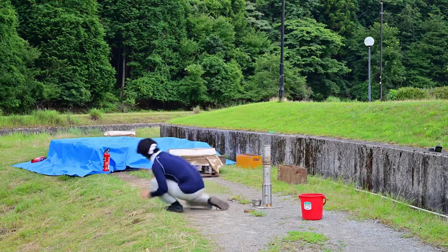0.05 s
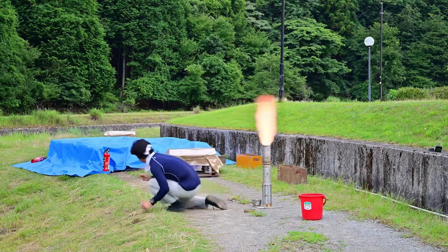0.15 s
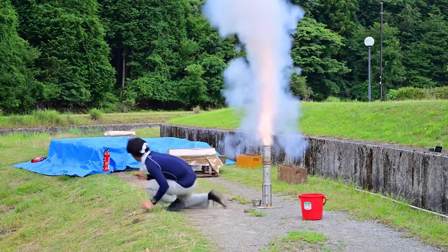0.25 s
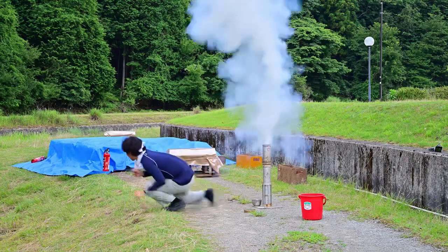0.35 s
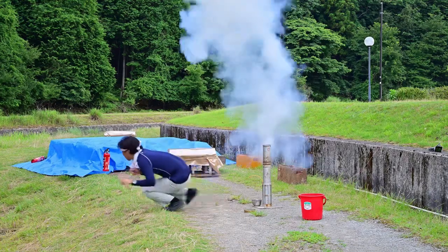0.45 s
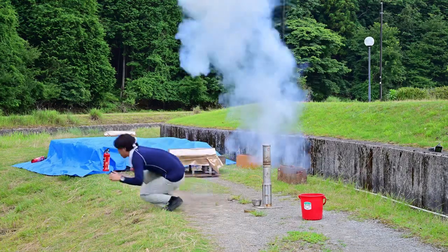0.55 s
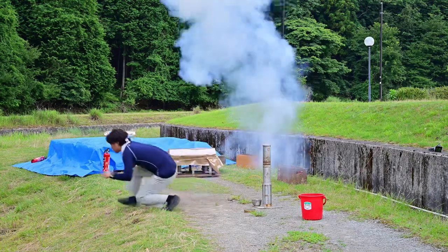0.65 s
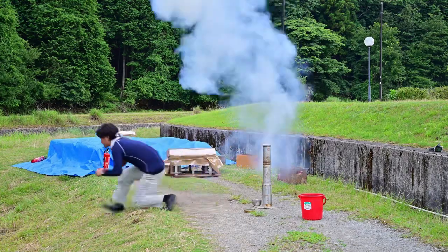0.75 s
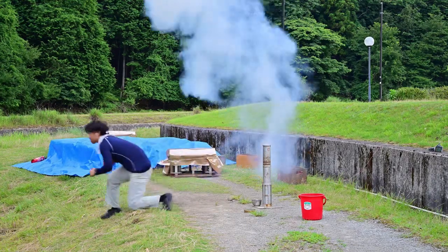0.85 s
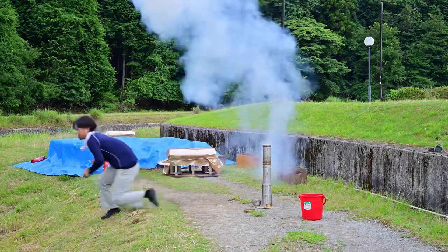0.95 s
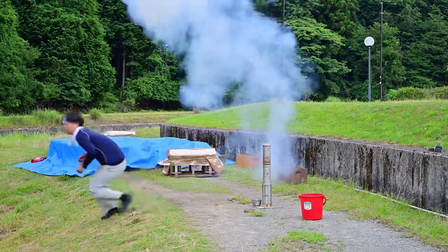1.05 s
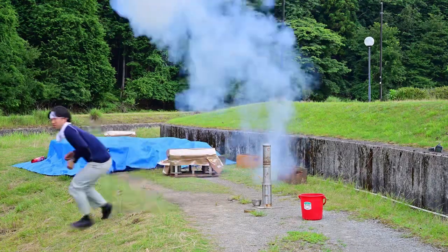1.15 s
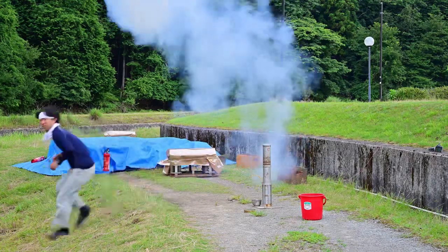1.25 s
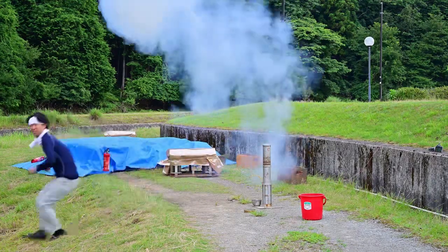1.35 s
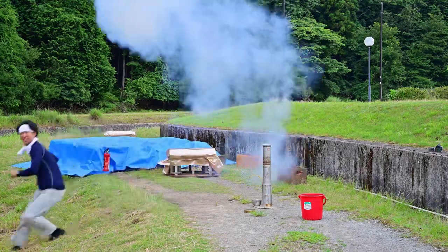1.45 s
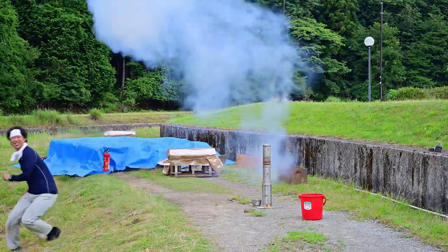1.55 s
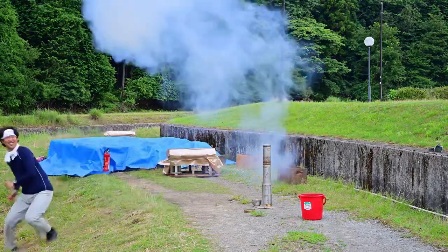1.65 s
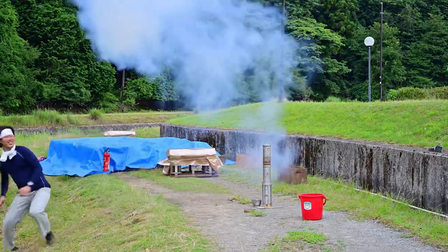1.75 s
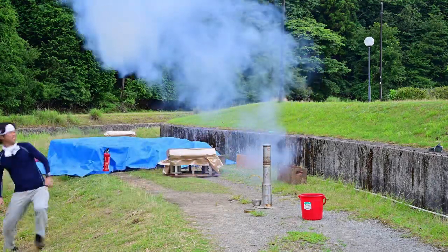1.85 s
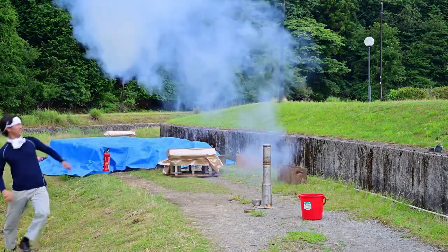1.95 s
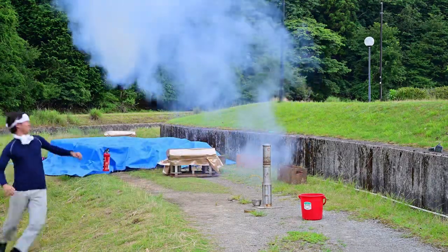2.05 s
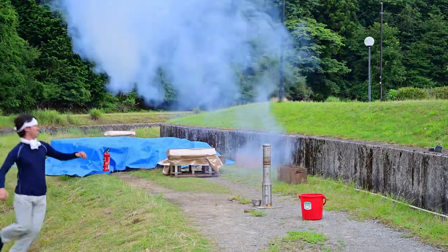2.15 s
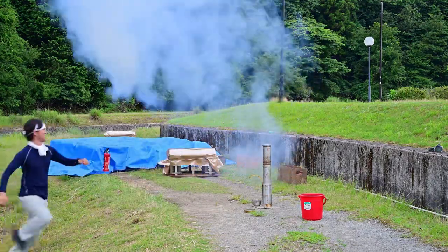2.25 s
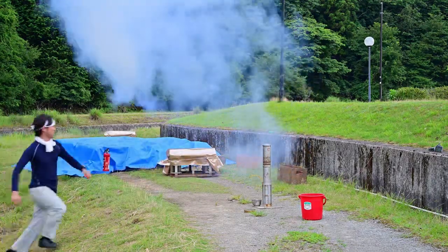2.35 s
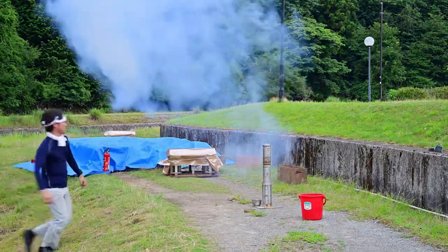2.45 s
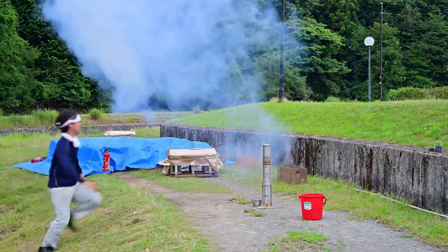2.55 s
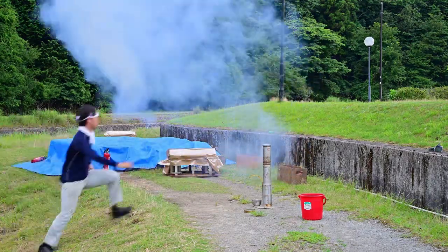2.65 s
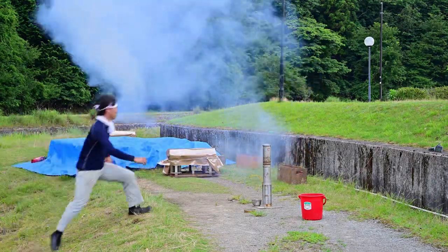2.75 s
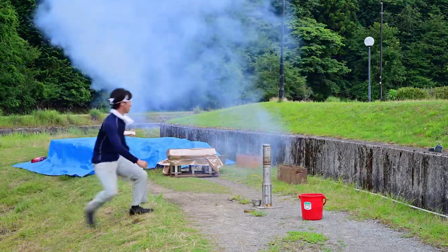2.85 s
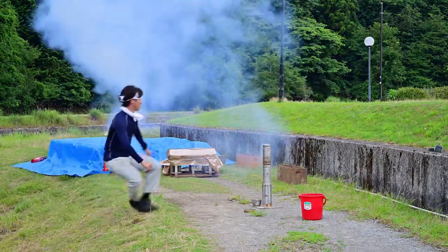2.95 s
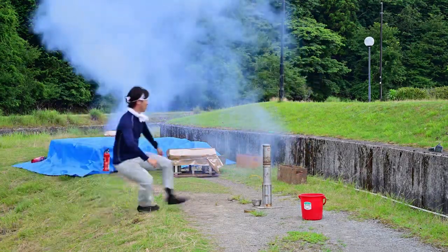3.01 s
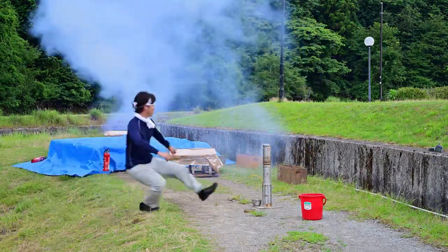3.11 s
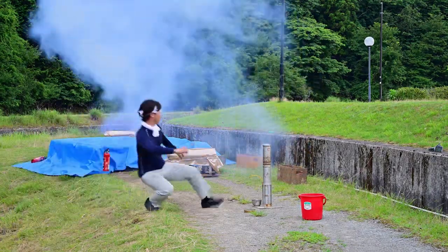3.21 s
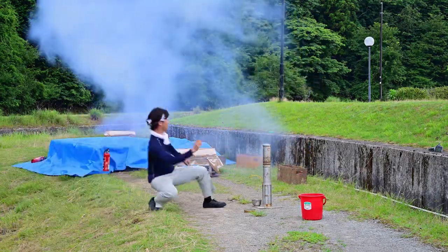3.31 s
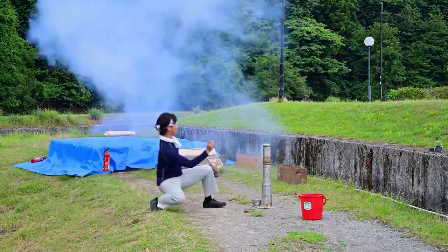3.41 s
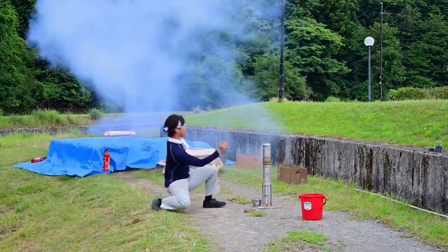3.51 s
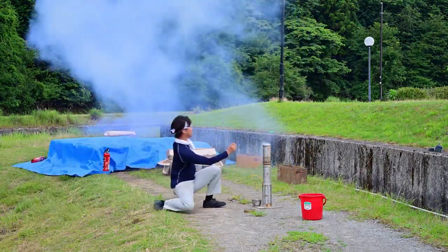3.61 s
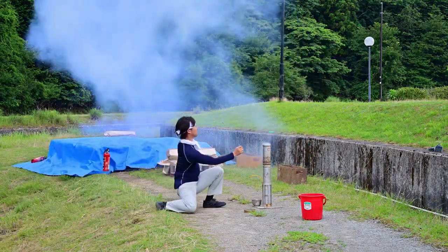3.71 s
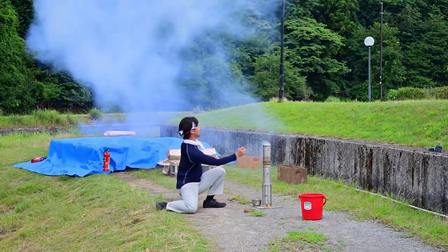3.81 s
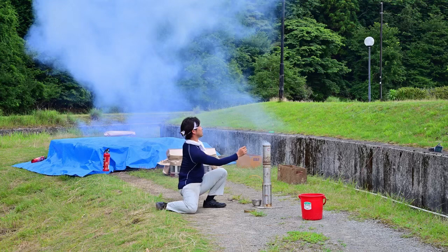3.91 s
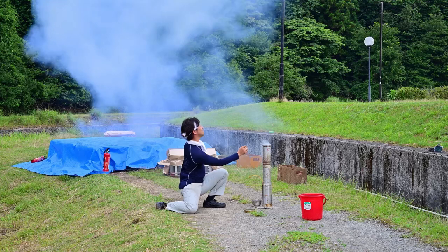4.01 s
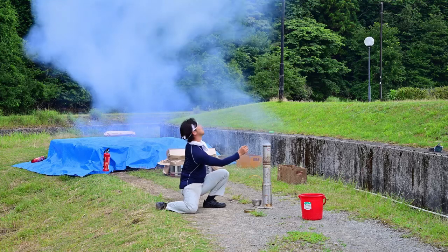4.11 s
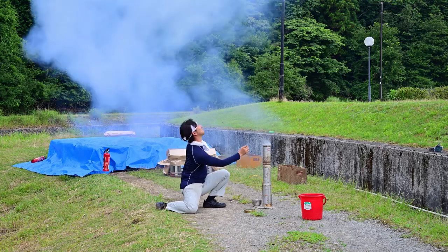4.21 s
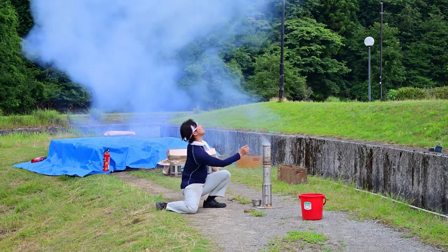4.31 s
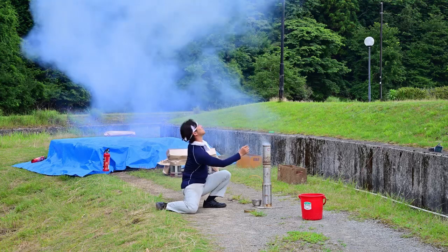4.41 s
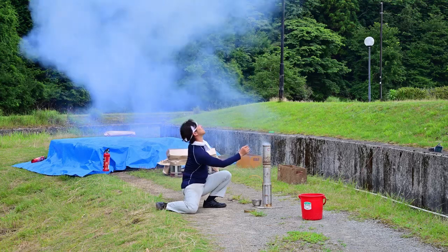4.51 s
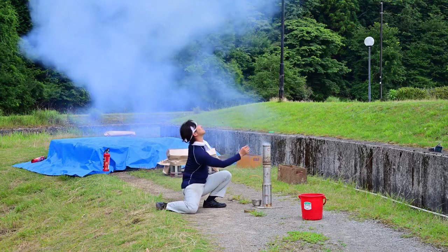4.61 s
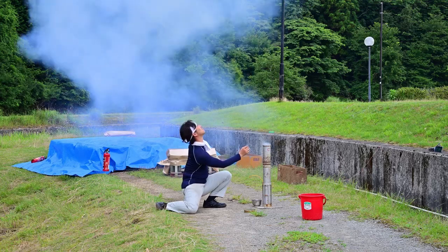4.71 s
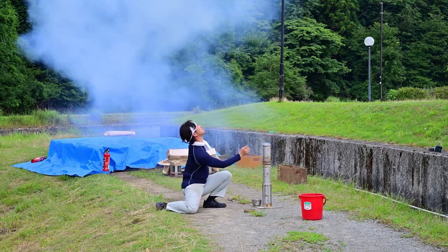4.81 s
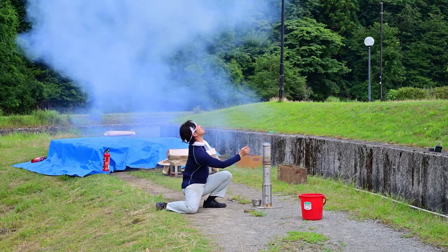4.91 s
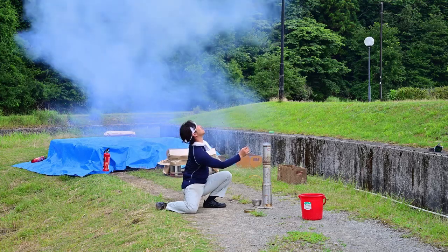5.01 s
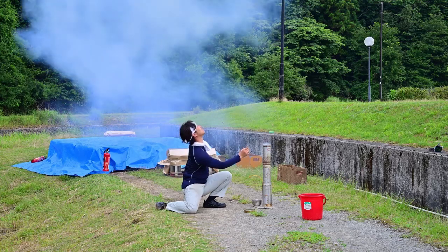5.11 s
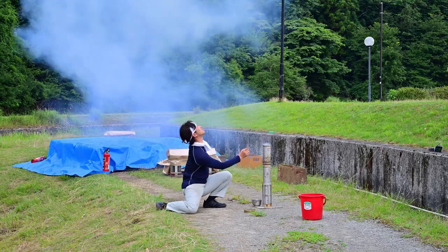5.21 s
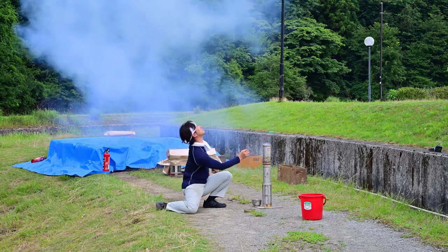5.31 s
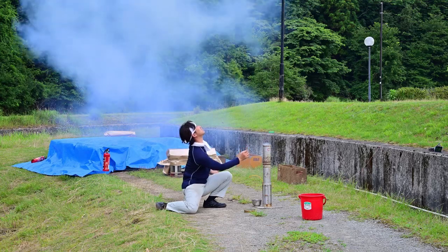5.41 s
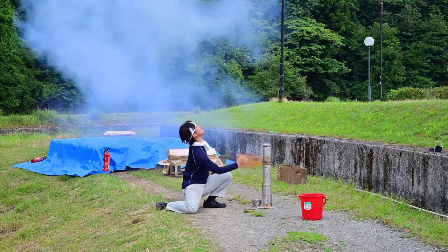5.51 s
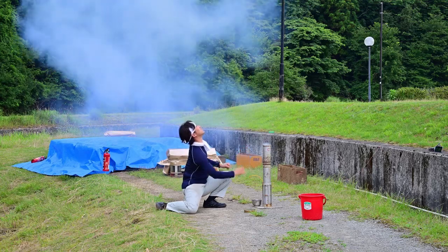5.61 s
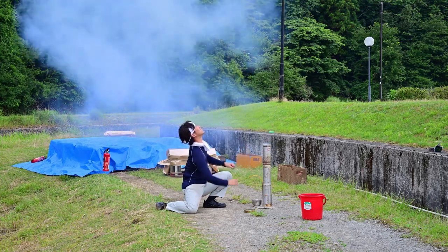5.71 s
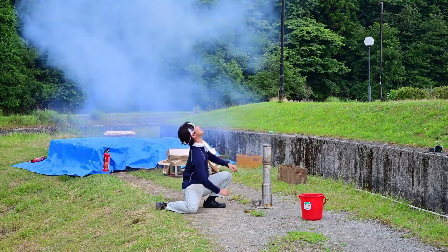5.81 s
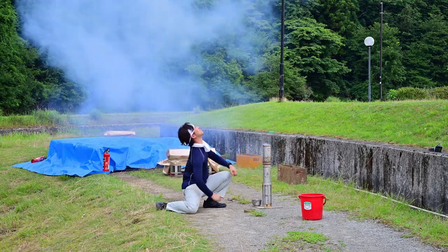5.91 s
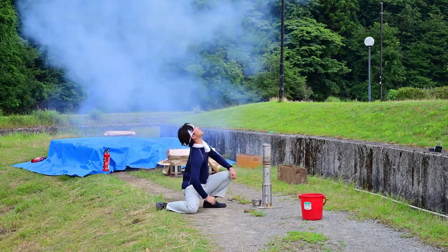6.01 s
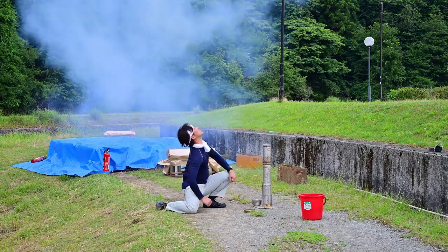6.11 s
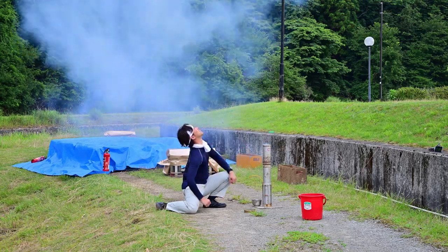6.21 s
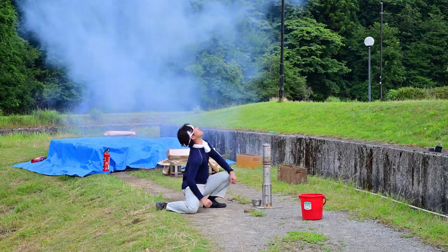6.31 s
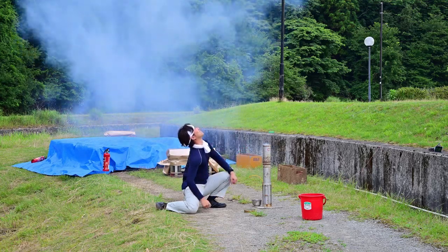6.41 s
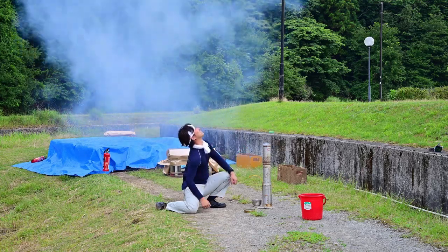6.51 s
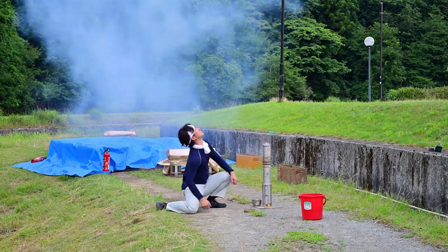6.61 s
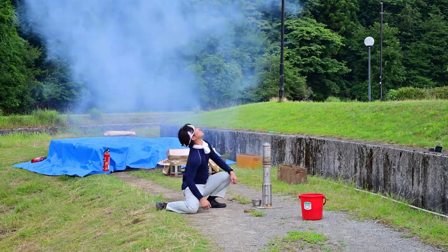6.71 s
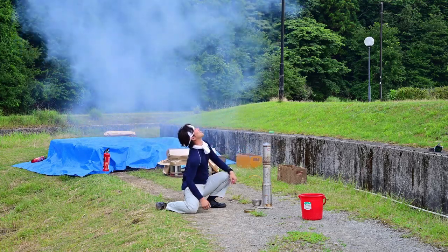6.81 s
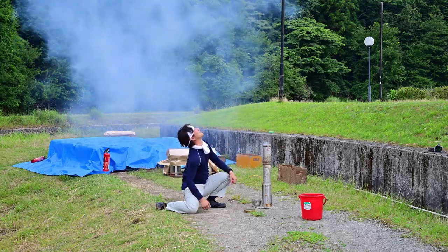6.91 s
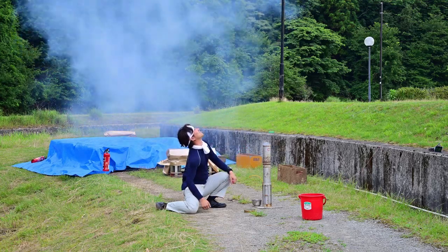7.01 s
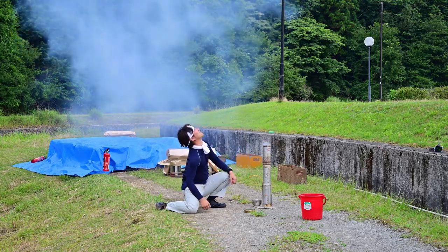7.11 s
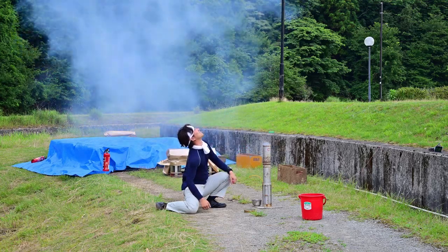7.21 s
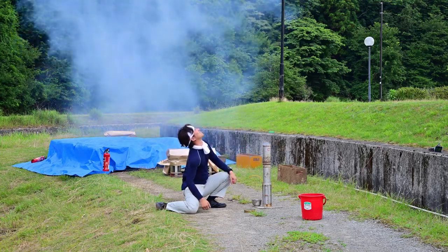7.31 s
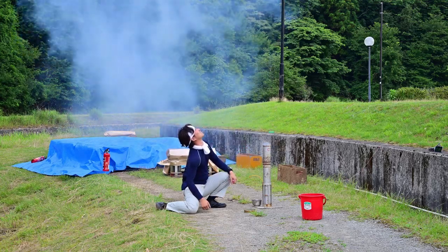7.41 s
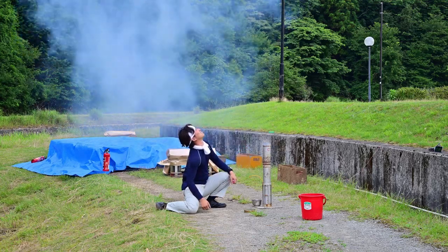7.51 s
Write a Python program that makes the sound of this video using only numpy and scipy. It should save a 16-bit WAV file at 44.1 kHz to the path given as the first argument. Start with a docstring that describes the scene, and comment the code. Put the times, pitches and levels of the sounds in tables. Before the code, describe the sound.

Outdoor firework launch: short hiss, ragged roaring thump, running steps on grass, insects, a sharp lone report, then a late string of heavy explosions.

```python
"""A fuse hisses, then gas surges from a steel mortar on a lawn: shaped noise makes a ragged roar and boom.
A man steps over grass, as damped tones and noise brushes; a small shell bursts, then a string of large ones.
Each burst is a pressure pulse that returns from the ground, a low wall and the woods, as delayed pulses
and scattered noise; under it the background sinks briefly. Insects, wind and hiss are filtered noise.
The loudest peaks are cut off at full scale."""
import sys
import numpy as np
from scipy import signal
from scipy.fft import rfft, irfft, next_fast_len
from scipy.io import wavfile
from scipy.ndimage import uniform_filter1d

SR = 44100
rng = np.random.default_rng(int(sys.argv[2]) if len(sys.argv) > 2 else 0)


def file_out(sig):
    """Save sig as 16-bit WAV at sys.argv[1]."""
    # one column per channel
    cols = np.atleast_2d(sig).T
    # limit, then scale
    lim = np.clip(cols, -1, 1)
    pcm = np.round(lim * 32767).astype(np.int16)
    wavfile.write(sys.argv[1], SR, pcm)


N = 333030  # samples

# Every spectrum below lists: frequency_hz, density_db (relative, per Hz)

# Overhead shells: start_s, level_db, push_ms, rebound (share), rattle (share), ground_delay_ms,
# ground_rebound (share), left_lag_ms, wall_level_db, woods_level_db, stretch (factor), size (0 to 1)
BURSTS = [(3.5570, 0.5, 0.6, 0.68, .027, 7.46, 0.57, 0.032, -12.5, 2.5, 0.93, 0.21),
          (6.4604, -3, 0.49, 2.47, 0.63, 7.44, .3, 0.17, -26, 15.5, 1.14, 0.71),
          (6.4646, -3, 0.83, 0.45, 0.089, 7.2, .75, 0.028, -1.5, 16, 1.06, 0.84),
          (6.7261, -5.5, 0.63, 2.7, 0.32, 7.25, 0.86, 0.053, -14, 15.5, 1.075, 0.68),
          (6.883, -2, 0.7, 1.74, .36, 7.18, 0.78, 0.054, -3, 17, 1.09, 0.73),
          (7.2027, -0.5, 0.61, 1.84, 0.37, 6.96, 0.64, 0.059, -1.5, 17, 1.066, 0.74)]
# Wall echoes after the ground echo: delay_ms (before stretch), level_db (re wall level), top_hz
WALL_ECHOES = [(4.2, 4.5, 2500), (6.3, -10.5, 1260), (8.3, -6.5, 800)]
# Nearest trunks: delay_ms (before stretch), level_db (before the woods level's share)
TREELINE_ECHOES = [(148, -24), (150.5, -23.5), (153, -24), (156, -27), (161, -39), (172, -31)]
# Scattered returns of a burst: delay_s (before stretch), rise_s, t60_s, level_db (re woods level),
# bass_db and treble_db (re that level, before the charge size is added)
BURST_RETURNS = [(0.016, .015, 0.2, -32, -4.5, -11), (.05, .01, 0.92, -49, 2, -12.5),
                 (.1, 0.0074, 0.8, -56, -7, 6), (.148, 0.0036, 0.58, -35.5, -6, -19),
                 (.19, .02, 1.5, -42.5, -8.5, -15), (.2, 0.1, 4.18, -46.5, -9, -14.5)]
# Spectrum of the woods' echo of a small shell
SMALL_ECHO_SPECTRUM = [(24, -42), (40, -11.5), (256, -7.5), (345, -7), (392, -5.5), (422, 1), (529, -4),
                       (3300, -22.5), (7540, -25.5), (12500, -49), (16000, -85)]
# Spectrum of the woods' echo of a large shell
LARGE_ECHO_SPECTRUM = [(15, -49), (25, -33.5), (120, -10.5), (309, -1), (463, -16.5), (677, -8), (796, -16),
                       (1070, -14), (2050, -22.5), (9840, -31.5), (12900, -45), (14400, -56), (16000, -105)]
# Left-right likeness of scattered echoes: frequency_hz, correlation (-1 to 1)
ECHO_CORRELATION = [(60, 1), (180, 0.98), (550, 0.91), (1650, 0.18), (4970, -0.3), (15000, 0.34)]
# Spectrum of the noise that rides on a shock
FIZZ_SPECTRUM = [(1500, -6.5), (5000, 0.0), (9000, -7.5), (14000, -7.0), (16000, -30.0)]
NEEDLE_MS, GROUND_NEEDLE_MS = .055, 0.068  # turf blunts the front
REBOUND_MS, REBOUND_MS_PER_SIZE = 0.71, 3.1  # a bigger charge rebounds longer
LAG_GROWTH_MS = .12  # added left lag of each later ground or wall echo, at size 1
ROLL_MS, ROLL_DB = 26, 1.22  # uneven stands of trees make the echo roll

# Surges of gas from the muzzle: start_s, roar_db, treble_db (re roar), boom_db, hold_ms, fade_db_per_ms
SURGES = [(0.2157, -3.5, 0.5, -8, 8, 4.5), (.232, -5.5, -2.5, -3.5, 3.3, .85),
          (.250, -19.5, 1.5, -17, 11.4, .8), (.285, -22, 1, -10, 2.2, .7), (0.353, -32, -20, -18.5, 10, 2)]
# Spectrum of the muzzle roar
ROAR_SPECTRUM = [(180, -31), (300, -9.5), (537, -11.5), (1100, -7), (2070, -11.5), (2400, -13.5),
                 (5430, -18), (6300, -19.5), (8360, -18.5), (16000, -39)]
# Spectrum of the muzzle boom
BOOM_SPECTRUM = [(12, -46), (20, -14), (49, -7.5), (139, -6), (177, -1), (238, -4), (296, -19), (500, -14),
                 (650, -43.5), (1100, -120)]
# Scattered returns of the lift, nearest first: delay_s, rise_s, t60_s, level_db,
# bass_db and treble_db (re that level)
LIFT_RETURNS = [(.17, .012, 0.66, -26.5, 6, -6), (.2, 0.039, 1.1, -27, -10, -11),
                (.3, .1, 3.7, -43.5, 2, -7.5)]
# Spectrum of the lift's echo
LIFT_ECHO_SPECTRUM = [(15, -53), (25, -22), (76, 0), (223, -12), (270, -12), (516, -7.5), (659, -12.5),
                      (1160, -11), (1400, -14.5), (9570, -29.5), (12500, -47), (14400, -51), (16000, -100)]
SURGE_RISE_DB_PER_MS = 4
SWELL_DB_PER_MS, SWELL_ROAR_DB, SWELL_BOOM_DB = 1.25, -19, -18  # gas swells before the first surge
TRAIL_S, TRAIL_ROAR_DB, TRAIL_BOOM_DB = .185, -39, -28  # and trails on weakly after it

# The tube kicks the ground: start_s, level_db, pitch_hz, t60_s
THUMP = (0.22, -11, 75.5, 0.2)
# Debris lands on something hard: centre_s, level_db, centre_hz, width_hz, length_ms
SNAP = (.345, -25.5, 3300, 1500, 3.5)
# Spectrum of the burning fuse
FUSE_SPECTRUM = [(120, -48), (200, -18), (245, -2), (350, -21), (2150, -7.5), (3630, -27.5), (4680, -10.5),
                 (7920, -8), (11500, -24), (15000, -53.5), (22000, -120)]
FUSE_DB = -59.5

# Feet land on turf: start_s, level_db, pitch_hz, pan_db (left above right)
THUDS = [(0.923, -42.5, 154, 0), (0.96, -44, 91.5, -2), (1.11, -44, 170, 0.0), (1.136, -45, 99.2, 1),
         (1.199, -48, 101, -2), (1.597, -44, 95.8, -2.5), (2.36, -58, 91.5, 0.5), (2.981, -52.5, 90, 10.5),
         (3.148, -52, 86.1, 6), (3.343, -48, 109.8, -12), (3.366, -46, 135, -17), (3.408, -50, 104.8, -20),
         (3.509, -44.5, 130, -19), (4.952, -52.5, 50.88, 16), (5.442, -52, 60.7, -16),
         (5.679, -49, 67.3, 3)]
# Grass and gravel scuff: start_s, level_db, length_s (fade by 26 dB), centre_hz, treble_db
SCUFFS = [(0.0226, -46.5, 0.041, 1900, -3.5), (0.124, -53, .045, 1880, -8), (0.164, -42, 0.03, 1500, -6),
          (0.824, -48, 0.1, 1200, -24), (0.87, -43.5, 0.047, 1170, -12), (0.976, -48, 0.081, 1340, -9),
          (1.021, -52.5, 0.064, 1130, -5), (1.118, -51.5, .06, 1016, -9), (1.151, -48.5, .06, 1820, -4),
          (2.996, -58, .035, 900, -14), (3.2796, -63, 0.049, 1236, -14), (3.318, -62.5, .05, 1590, -16),
          (3.349, -60, 0.025, 1500, -18), (5.761, -52, .075, 1500, -8), (5.806, -45, 0.031, 1540, -8),
          (5.822, -57.5, 0.15, 1300, -10)]

# Spectrum of the insects before the small burst
CHORUS_HIGH_SPECTRUM = [(2060, -58.5), (3500, -34.5), (4250, -32.5), (5620, -15), (7800, 0.5), (8660, -6),
                        (10500, -32.5), (11200, -42), (11500, -36), (15000, -70), (22000, -120)]
# Spectrum of the insects after it
CHORUS_LOW_SPECTRUM = [(2350, -56), (4000, -28), (4700, -20), (5360, -11.5), (5730, -5.5), (6680, -2),
                       (7450, -2), (7840, -2), (9210, -15.5), (10600, -33.5), (11000, -46.5), (14300, -73),
                       (22000, -120)]
CHORUS_DB, CHORUS_AFTER_DB = -55.5, -56  # before each side's own offset

# Wind gusts through time: time_s, level_db
WIND_LEVEL = [(0.0, -59), (0.12, -65.5), (1.7, -66), (2.08, -73), (2.4, -63), (2.71, -68.5), (3.05, -66),
              (3.16, -52), (3.3, -54.5), (3.36, -52.5), (3.5, -52), (4.3, -71.5), (4.601, -61), (4.82, -66),
              (4.98, -58), (5.17, -77.5), (5.5, -60), (6.36, -67)]
# Spectrum of wind rumble on the microphone
GUST_SPECTRUM = [(8.8, -43), (15, -8), (40, -1), (108, 6), (155, -8), (254, -16), (335, -25.5), (400, -30),
                 (520, -56), (880, -120)]
# Spectrum of the field's faint wash
AIR_SPECTRUM = [(88, -29), (150, -1), (658, -8.5), (932, -14.5), (1270, -17), (4200, -30), (5460, -61),
                (9240, -120)]
AIR_DB, RUMBLE_DB = -65.5, -68  # the rumble stays between gusts
# Low hum that comes and goes: start_s, length_s, pitch_hz, level_db
HUM = [(2.07, 0.3, 79.9, -58.5), (2.65, 0.3, 76.7, -58), (4.497, 0.28, 76.7, -57.5), (6.2, 0.18, 80.6, -59)]

# Spectrum of the microphone's own noise
HISS_SPECTRUM = [(9000, -29.5), (11500, 1), (15000, -4.5), (16000, -20.5)]
HISS_DB = -91.5
# A narrow dip near 11 kHz: frequency_hz, gain_db
TREBLE_DIP = [(9500, -2), (10600, -0.5), (11000, -19.5), (11500, -1), (12500, 1.5)]
# Brightness of the right port: frequency_hz, right_above_left_db
RIGHT_ABOVE_LEFT = [(8000, -0.5), (11000, -3), (14000, 6.5)]
EDGE_HZ = 16200


def amp(db):
    """Decibels become an amplitude ratio."""
    return 10 ** (np.asarray(db) / 20)


def evened(x):
    """Division by the root mean square gives unit power."""
    return x / np.sqrt(np.mean(x ** 2) + 1e-20)


def read(points, hz):
    """A response is interpolated linearly over log frequency."""
    f, value = np.transpose(points)
    return np.interp(np.log(hz + 1), np.log(f + 1), value)


def add(mix, start_s, sound):
    """Superposition: a sound is summed into the mix at its start, cut at the end."""
    part = mix[:, round(start_s * SR):][:, :sound.shape[-1]]
    part += sound[..., :part.shape[-1]]


def lumps(n, ms, db):
    """Slow amplitude modulation: a random gain wanders by db within about ms."""
    wide = max(round(ms * SR / 1000), 1)
    wander = uniform_filter1d(uniform_filter1d(rng.standard_normal(n), wide), wide)
    return evened(amp(db * evened(wander)))


def noise(n, colour_db, same, lumpy_ms=1, lumpy_db=0):
    """Partial coherence: spectra of two noises share a part set by same(hz), shaped by colour_db(hz)."""
    a, b = rfft(rng.standard_normal((2, n)) * lumps(n, lumpy_ms, lumpy_db))
    hz = np.fft.rfftfreq(n, 1 / SR)
    c = np.clip(same(hz), -1, 1)
    right = c * a + np.sqrt(1 - c ** 2) * b
    return hz, amp(colour_db(hz)) * np.array([a, right])


def steady(spectrum, same, lumpy_ms=1, lumpy_db=0, n=N):
    """Spectral shaping: stereo noise of one colour at rms 1."""
    _, z = noise(n, lambda hz: read(spectrum, hz), lambda hz: same + 0 * hz, lumpy_ms, lumpy_db)
    return evened(irfft(z, n))


def shock(ms, push_ms, rebound_ms, rebound, spike, edge_ms, back_ms, size):
    """Transient response of the capsule to a shock front: a needle, a short deep swing, then a rebound,
    a brief hump for a small charge, a long slope through zero for a large one."""
    front = .5 + .5 * np.tanh((ms - 2.68 * edge_ms) / edge_ms)
    back = .5 + .5 * np.tanh((ms - push_ms - 1.8 * edge_ms) / back_ms)
    u = np.maximum(ms - push_ms, 0) / rebound_ms
    slope, hump = (1 - u) * np.exp(-.8 * u), np.exp(-u ** 5)
    fall = size * slope + (1 - size) * hump
    swing = front * (1 - back)
    needle = spike * np.exp(-(ms / edge_ms) ** 2)
    return needle - swing + back * rebound * fall, swing


def burst(start_s, level_db, push_ms, rebound, rattle, ground_ms, ground_rebound, lag_ms,
          wall_db, woods_db, stretch, size):
    """Reflection: a direct shock, its ground copy, duller wall and tree-line copies, then the woods."""
    out, echo = np.zeros((2, 2, N))
    left = np.array([[1], [0]])
    ms = np.arange(-200, 12000) * 1000 / SR - lag_ms * left
    size = np.clip(size, 0, 1)
    rebound_ms = REBOUND_MS + REBOUND_MS_PER_SIZE * size
    growth_ms = LAG_GROWTH_MS * size

    # the needle's height does not depend on the level of the swing
    direct, swing = shock(ms, push_ms, rebound_ms, rebound, 0.99 / amp(level_db), NEEDLE_MS, 0.13, size)
    fizz = steady(FIZZ_SPECTRUM, 0.27, n=ms.shape[1])
    near = amp(level_db) * direct + rattle * swing * fizz
    # the lawn scatters the front
    near += amp(-41.5 + 15.0 * size) * fizz * (ms > 0) * np.exp(-np.maximum(ms, 0) / 15)

    ground, swing = shock(ms - ground_ms - growth_ms * left, 1.23 * push_ms, rebound_ms,
                          ground_rebound, 0.77, GROUND_NEEDLE_MS, 0.22, size)
    near += 1.22 * ground + 0.17 * rattle * swing * fizz

    for k, (delay_ms, echo_db, top_hz) in enumerate(WALL_ECHOES):
        late = ms - ground_ms - stretch * delay_ms - (k + 2) * growth_ms * left
        wall, _ = shock(late, 1.05 * push_ms, 0.89 * rebound_ms, .65, 0, 350 / top_hz, 0.39, size)
        near += amp(wall_db + echo_db) * wall

    for delay_ms, echo_db in TREELINE_ECHOES:
        trunk, _ = shock(ms - stretch * delay_ms, 1.05 + .5 * size, 1.06 + size, 0.38, 0, 0.17, 0.17, size)
        near += amp(0.66 * woods_db + echo_db) * trunk

    # a blast in open air leaves no lasting push
    highpass = signal.butter(2, (70 - 20 * size) / (SR / 2), "high")
    add(out, start_s - 200 / SR, signal.lfilter(*highpass, near))

    returns = np.array(BURST_RETURNS)
    returns[:, 0] *= stretch
    returns[:, 4] += 11 * size - 2  # a large charge carries more bass
    returns[:, 5] += 3 * size

    def colour_db(hz):
        """Linear blend of the small and large echo spectra in decibels."""
        return (1 - size) * read(SMALL_ECHO_SPECTRUM, hz) + size * read(LARGE_ECHO_SPECTRUM, hz)

    add(echo, start_s, amp(woods_db) * woods(returns, colour_db, 0.85))
    return out, echo


def woods(returns, colour_db, lumpy_db):
    """Diffuse scattering: countless trunks and banks send a bang back in returns that swell and decay,
    each with its own share of bass and treble."""
    t = np.arange(round(2.6 * SR)) / SR
    power = np.zeros((3, len(t)))  # middle, bass, treble
    for delay_s, rise_s, t60_s, level_db, bass_db, treble_db in returns:
        late = np.maximum(t - delay_s, 0)
        decay_db = level_db - 60 * late / t60_s
        band_db = np.array([[0], [bass_db], [treble_db]])
        power += (amp(decay_db + band_db) * (1 - np.exp(-late / rise_s))) ** 2
    n = next_fast_len(len(t))
    hz, z = noise(n, colour_db, lambda hz: read(ECHO_CORRELATION, hz), 2.56, lumpy_db)
    low = 1 / (1 + (hz / 250) ** 6)
    high = 1 / (1 + (2000 / (hz + 1)) ** 6)
    below_5khz = 1 / (1 + (hz / 5000) ** 6)
    # the treble level is that of 2-5 kHz
    treble_rms = np.sqrt(np.mean(irfft(z * high * below_5khz, n) ** 2))
    middle = evened(irfft(z * (1 - low - high), n))
    bass = evened(irfft(z * low, n))
    treble = irfft(z * high, n) / treble_rms
    return sum(band[:, :len(t)] * np.sqrt(p) * lumps(len(t), ROLL_MS, ROLL_DB)
               for band, p in zip((middle, bass, treble), power))


def lift():
    """Turbulent jet noise: gas tears out in surges, a crackling roar over a deep boom, then the echo."""
    first_s = SURGES[0][0]
    ms = np.arange(round(.45 * SR)) * 1000 / SR
    since = ms - 1000 * first_s
    # rows: roar body, roar treble, boom
    swell_db = np.array([[SWELL_ROAR_DB], [SWELL_ROAR_DB - 7], [SWELL_BOOM_DB]])
    swell = amp(SWELL_DB_PER_MS * since + swell_db) * (since < 0)
    trail_db = np.array([[TRAIL_ROAR_DB], [TRAIL_ROAR_DB - 0.5], [TRAIL_BOOM_DB]])
    trail = amp(trail_db - 1.1 * np.maximum(since - 1000 * TRAIL_S, 0)) * (since >= 0)
    power = swell ** 2 + trail ** 2
    for start_s, roar_db, treble_db, boom_db, hold_ms, fade_db_per_ms in SURGES:
        after = ms - 1000 * start_s
        rise_db = SURGE_RISE_DB_PER_MS * np.minimum(after, 0)
        fade_db = fade_db_per_ms * np.maximum(after - hold_ms, 0)
        power += amp(rise_db - fade_db + np.array([[roar_db], [roar_db + treble_db], [boom_db]])) ** 2
    roar = steady(ROAR_SPECTRUM, 0.68, 1.0, 0.63, len(ms))
    body = signal.filtfilt(*signal.butter(2, 2500 / (SR / 2)), roar)
    boom = steady(BOOM_SPECTRUM, 0.98, 1, 0, len(ms))
    out = np.zeros((2, N))
    add(out, 0, sum(part * np.sqrt(p) for part, p in zip((body, roar - body, boom), power)))
    add(out, first_s, woods(LIFT_RETURNS, lambda hz: read(LIFT_ECHO_SPECTRUM, hz), 0.73))
    return out


def knocks():
    """Impact: a decaying low tone for the tube's kick and one bright noise pulse for the snap."""
    out, t = np.zeros((2, N)), np.arange(SR // 2) / SR
    start_s, level_db, pitch_hz, t60_s = THUMP
    add(out, start_s, amp(level_db - 60 * t / t60_s) * np.sin(2 * np.pi * pitch_hz * t))
    centre_s, level_db, hz, width_hz, length_ms = SNAP
    colour = [(hz - width_hz, -22), (hz - width_hz / 3, -2), (hz, 0), (hz + width_hz, -10),
              (10000, -14), (15000, -30)]
    pulse = np.exp(-((t - .01) * 1000 / length_ms) ** 2)
    add(out, centre_s - .01, amp(level_db) * pulse * steady(colour, .7, n=len(t)))
    return out


def fuse():
    """Combustion noise: the fuse hisses until the charge goes."""
    out, n = np.zeros((2, N)), round(.21 * SR)
    add(out, 0, amp(FUSE_DB) * steady(FUSE_SPECTRUM, .5, 12, 2, n))
    return out


def steps():
    """Damped oscillation and friction: each footfall pushes the turf and sags in pitch; scuffs crackle."""
    out, t = np.zeros((2, N)), np.arange(8000) / SR
    for start_s, level_db, pitch_hz, pan_db in THUDS:
        turn = 2 * np.pi * pitch_hz * (t + .004 * (1 - np.exp(-t / 0.012)))
        push = (t / 0.0064) * np.exp(1 - t / 0.0075)
        add(out, start_s, amp(level_db + np.array([[.5], [-.5]]) * pan_db) * np.sin(turn) * push)
    for start_s, level_db, length_s, hz, treble_db in SCUFFS:
        colour = [(hz / 5, -25), (hz / 2, -6), (hz, 0), (2 * hz, -8), (2.3 * hz, treble_db - 2),
                  (9000, treble_db), (11500, treble_db - 8.5), (15000, treble_db - 25)]
        grit = steady(colour, .5, 1.0, 3.5, len(t))
        fade = amp(-26 * (t / max(length_s, .005)) ** 1.1)
        add(out, start_s, amp(level_db) * grit * np.minimum(t / 0.00403, 1) * fade)
    return out


def chorus():
    """Band-limited noise: insect song, stronger on the left, sits lower after the small burst."""
    after = np.clip((np.arange(N) / SR - BURSTS[0][0]) / 0.056, 0, 1)
    high = steady(CHORUS_HIGH_SPECTRUM, 0.26, 8, 0.92) * amp(CHORUS_DB + np.array([[2.5], [-5.5]]))
    low = steady(CHORUS_LOW_SPECTRUM, 0.16, 8, 0.81) * amp(CHORUS_AFTER_DB + np.array([[2], [-3]]))
    return np.sqrt(1 - after) * high + np.sqrt(after) * low


def wind():
    """Turbulent pressure: lumpy rumble on the microphone over the faint wash of the field."""
    level_db = np.interp(np.arange(N) / SR, *np.transpose(WIND_LEVEL))
    gusts = amp(level_db) * steady(GUST_SPECTRUM, 0.34, 40, 4.1)
    rumble = amp(RUMBLE_DB) * steady(GUST_SPECTRUM, .3, 60, 1.5)
    wash = amp(AIR_DB) * steady(AIR_SPECTRUM, 0.61, 30, 0.92)
    return gusts + rumble + wash


def hum():
    """Harmonic tones: soft low sines with a weak octave."""
    out = np.zeros((2, N))
    for start_s, length_s, pitch_hz, level_db in HUM:
        turn = 2 * np.pi * pitch_hz * np.arange(round(length_s * SR)) / SR
        tone = np.sin(turn) + 0.15 * np.sin(2 * turn)
        add(out, start_s, amp(level_db) * tone * signal.windows.tukey(len(turn), .5))
    return out


def shock_dip():
    """Gain modulation: the background sinks for some milliseconds under every overhead shock."""
    t = np.arange(N) / SR
    after = [np.where(t > row[0], np.exp(-(np.maximum(t - row[0], 0) / 0.0083) ** 2), 0) for row in BURSTS]
    return amp(-17 * np.max(after, 0))


def scene():
    """Superposition of shocks, the dipping background and the microphone's hiss."""
    shocks, echoes = np.sum([burst(*row) for row in BURSTS], 0)
    background = echoes + lift() + knocks() + fuse() + steps() + chorus() + wind() + hum()
    return shocks + shock_dip() * background + amp(HISS_DB) * steady(HISS_SPECTRUM, .1)


def record(dry):
    """Linear filtering and saturation: a narrow treble dip and a brighter right side, overload at full scale,
    band limit."""
    hz = np.fft.rfftfreq(4096, 1 / SR)
    side_db = np.array([[-.5], [.5]]) * read(RIGHT_ABOVE_LEFT, hz)
    log_gain = np.log(amp(read(TREBLE_DIP, hz) + side_db))
    circle = np.concatenate([log_gain, log_gain[:, -2:0:-1]], 1)
    # minimum phase, so causal: nothing rings before a front
    colour = np.fft.ifft(np.exp(np.conj(signal.hilbert(circle)))).real
    full = np.clip(signal.oaconvolve(dry, colour, axes=1)[:, :N], -1, 1)
    edge = signal.firwin(511, EDGE_HZ, window=("kaiser", 9), fs=SR)
    return np.clip(signal.oaconvolve(full, edge[None], "same"), -1, 1)


dry = scene()
out = record(dry)
file_out(out)
```